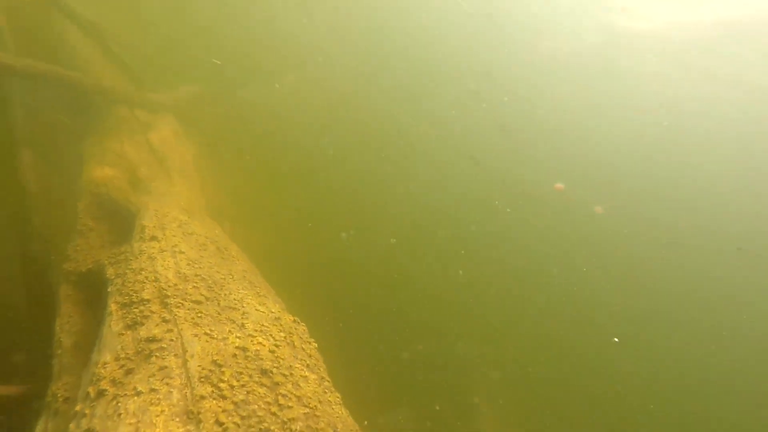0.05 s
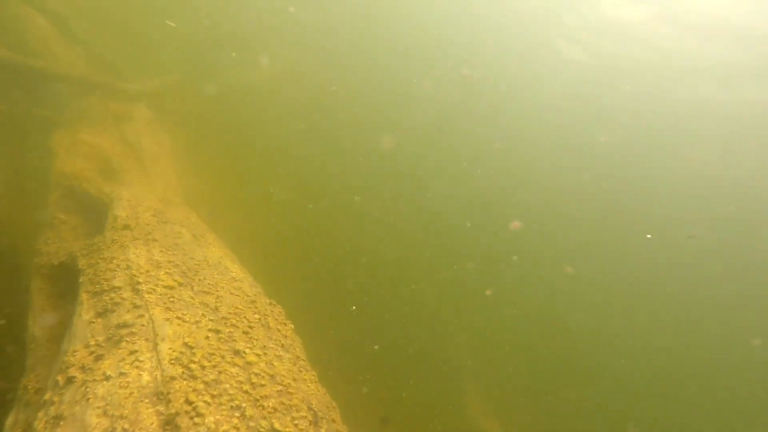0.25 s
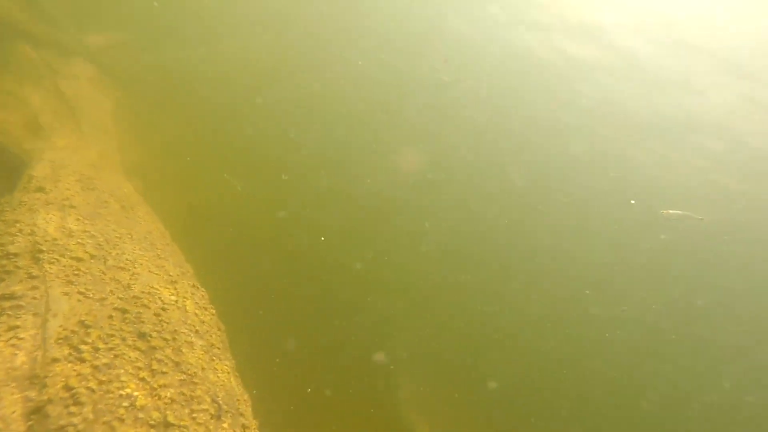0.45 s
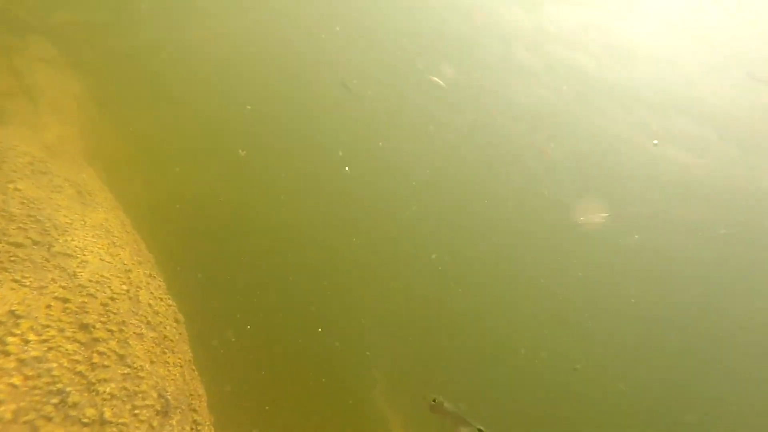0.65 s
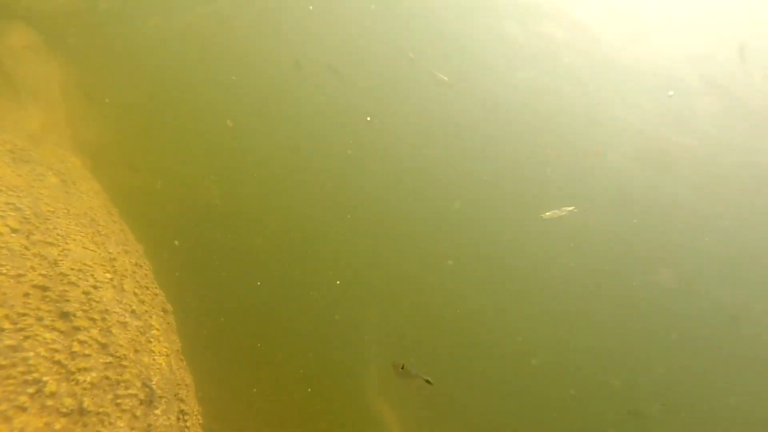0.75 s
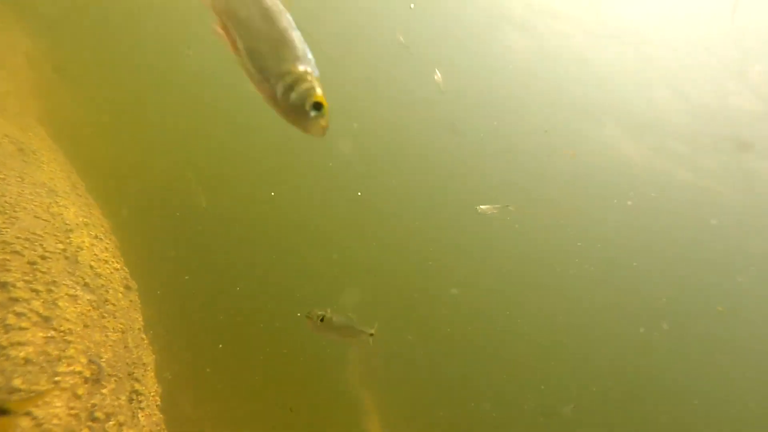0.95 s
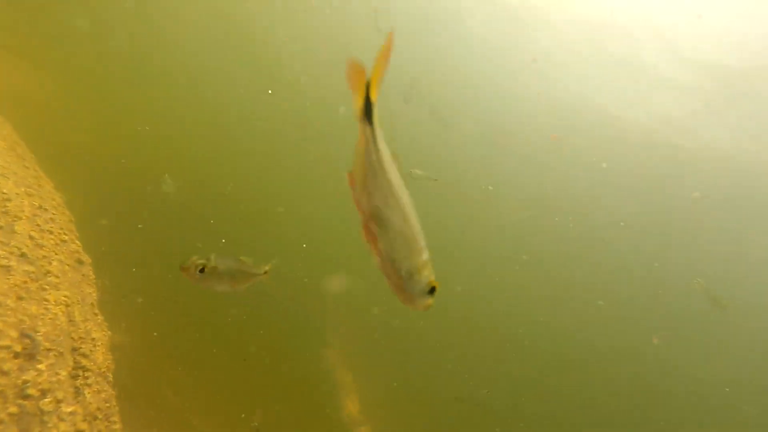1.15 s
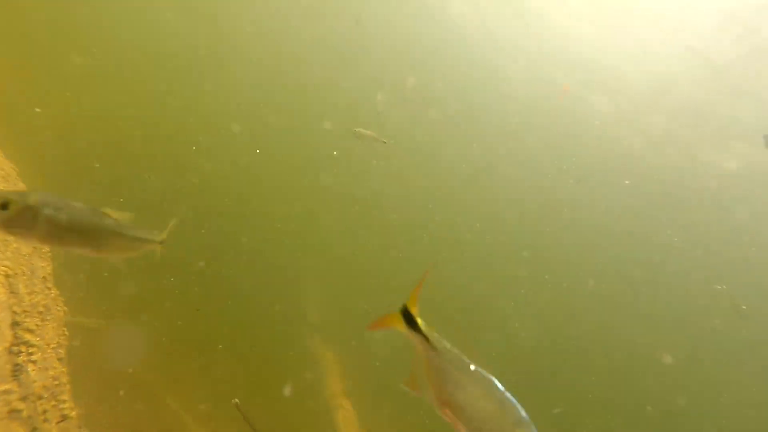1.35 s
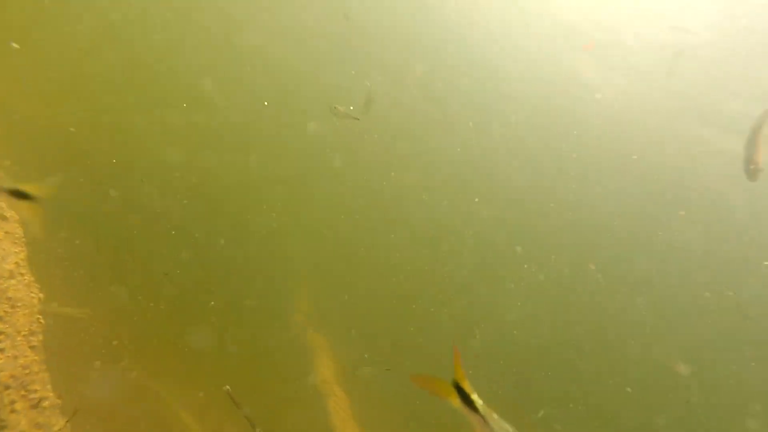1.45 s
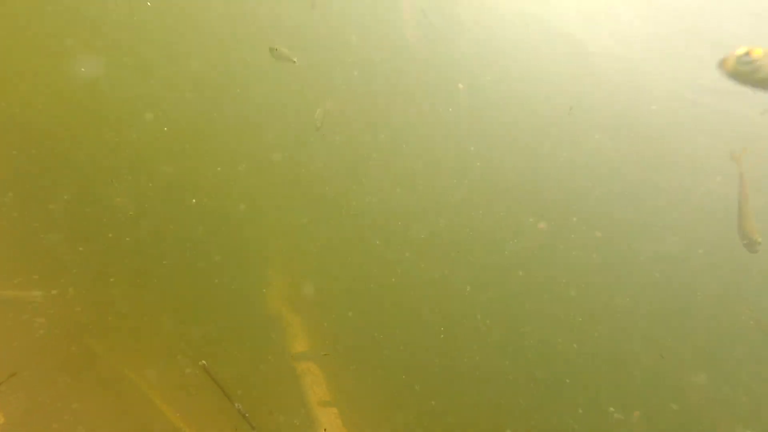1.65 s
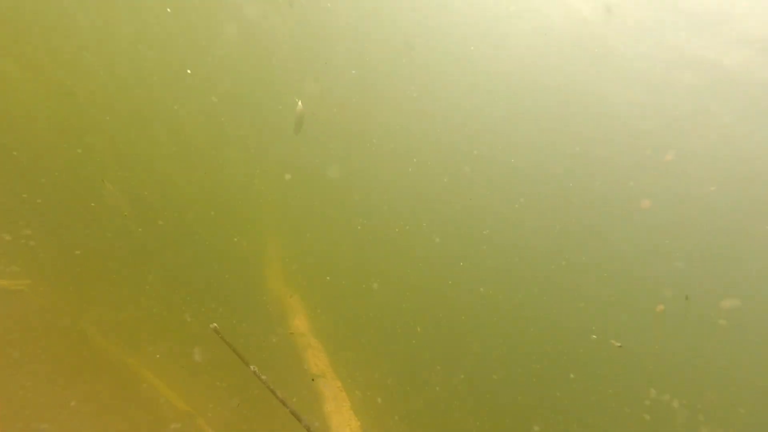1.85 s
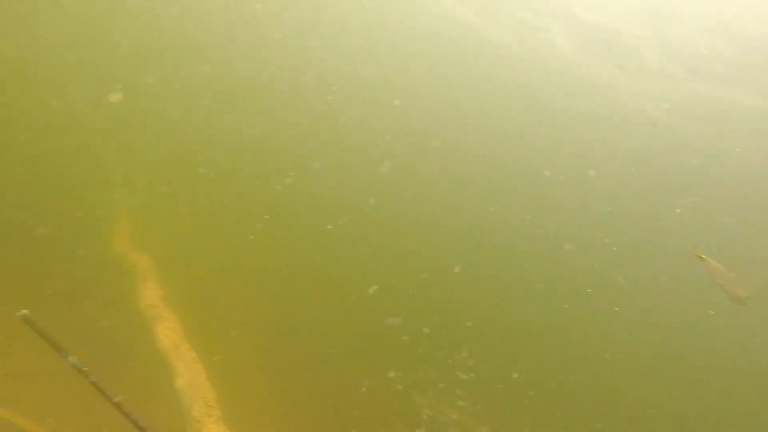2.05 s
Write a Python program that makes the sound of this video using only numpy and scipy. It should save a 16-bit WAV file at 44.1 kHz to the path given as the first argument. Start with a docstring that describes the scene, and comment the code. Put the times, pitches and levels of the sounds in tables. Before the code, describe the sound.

Heard from inside a sealed housing under murky water: loud hollow knocks and gritty rubbing early on, then a long near-quiet of dull rushing water, ended by faint gear bumps, a bubble, a plop and a click.

```python
"""Knocked camera housing under water

Place: under murky water, the microphone behind the housing wall, every contact right against it.
Three hard knocks in quick succession crack as shaped noise, ring damped modes and boom; dense tiny slips scrape
between them. Coloured noise rushes and sways past; later come two soft bumps of the gear, a bubble, a low plop
and a short click, all damped modes. The camera's gain control ducks at the knocks and slowly lets the rush back in."""
import sys
import numpy as np
from scipy import signal
from scipy.fft import rfft, irfft, next_fast_len
from scipy.io import wavfile
from scipy.ndimage import uniform_filter1d, minimum_filter1d

SR = 44100
rng = np.random.default_rng(int(sys.argv[2]) if len(sys.argv) > 2 else 0)


def store_pcm(level_fs):
    """Save levels as 16-bit WAV."""
    pcm = np.round(np.clip(level_fs, -1, 1) * 32767).astype(np.int16)
    wavfile.write(sys.argv[1], SR, np.atleast_2d(pcm).T)


N = 92610  # samples, 2.1 s


def amp(db):
    """Decibels to amplitude gain."""
    return 10 ** (np.asarray(db) / 20)


def unit(x):
    """Scale to rms 1."""
    return x / np.sqrt(np.mean(x ** 2) + 1e-20)


def since(start_s):
    """Seconds after start_s, zero before it."""
    return np.maximum(np.arange(N) / SR - start_s, 0)


def filtered(x, response):
    """Multiply the spectrum of x by a response of frequency, padded against wrap-around."""
    size = next_fast_len(N + 8192)
    spectrum = rfft(x, size) * response(np.fft.rfftfreq(size, 1 / SR))
    return irfft(spectrum, size)[:N]


def curve_gain(hz, points):
    """Gain at hz along (f/Hz, level/dB) points joined over log frequency."""
    f, db = np.transpose(points)
    return amp(np.interp(np.log(hz + 1), np.log(f), db))


def coloured(x, points):
    """Shape x by the curve through the points, at rms 1."""
    return unit(filtered(x, lambda hz: curve_gain(hz, points)))


def struck(force, points):
    """Pass force through a minimum-phase body of unit energy, which never sounds before the blow."""
    size = 2048
    cepstrum = irfft(np.log(curve_gain(np.fft.rfftfreq(size, 1 / SR), points)))
    # folding the cepstrum onto positive times makes the response causal
    cepstrum[1:size // 2] *= 2
    cepstrum[size // 2 + 1:] = 0
    response = irfft(np.exp(rfft(cepstrum)))
    return signal.fftconvolve(force, response / np.linalg.norm(response))[:N]


def ring(start_s, hz, t60, rise):
    """One damped mode: a sine that rises softly and falls 60 dB in t60 seconds."""
    t = since(start_s)
    return np.sin(2 * np.pi * hz * t) * amp(-60 * t / t60) * (1 - np.exp(-t / rise))


RUSH_DB, PATCHY_DB = -55.5, 0.5  # rush rms level; rms wander of its patches
# Spectrum of water rushing past: f/Hz, relative level/dB
RUSH_COLOUR = [(60, -16), (110, -2), (240, -5.5), (400, -7.5), (800, -12.5), (1600, -16), (3300, -21),
               (6500, -29), (11000, -37), (14400, -47.5), (16000, -61)]
# Spectrum of the slow water pressure on the housing: f/Hz, relative level/dB
SWAY_COLOUR = [(15, -3.5), (30, -1.5), (60, -11), (130, -17), (250, -30), (600, -58.5), (2000, -120)]
# Rise and fall of that pressure: t/s, level/dB
SWAY_LEVEL = [(0, -55), (.3, -37.5), (0.701, -53.5), (1.439, -52.5), (1.486, -39), (1.58, -53), (1.72, -57),
              (1.8, -48), (1.95, -54.5), (2.022, -40), (2.1, -45.5)]


def water():
    """A steady, slightly patchy noise rush over the slow pressure of water on the housing."""
    spectrogram = signal.stft(rng.standard_normal(N), nperseg=512)[2]
    # patches about 6 bins tall and 14 frames long
    field = uniform_filter1d(rng.standard_normal(spectrogram.shape), size=6, axis=0)
    field = uniform_filter1d(field, size=14, axis=1)
    patchy = signal.istft(spectrogram * amp(PATCHY_DB * unit(field)))[1][:N]
    rush = amp(RUSH_DB) * coloured(patchy, RUSH_COLOUR)
    sway_db = np.interp(np.arange(N) / SR, *np.transpose(SWAY_LEVEL))
    return rush + amp(sway_db) * coloured(rng.standard_normal(N), SWAY_COLOUR)


# Soft bumps of the gear: t/s, level/dB
BUMPS = [(1.5053, -27), (2.09, -43.5)]
# Modes every bump rings with: f/Hz, level relative to the bump/dB, t60/s
BUMP_MODES = [(129, 4.5, .035), (376, 1, 0.04), (594, -1, 0.092), (710, -10, 0.015)]
# A bubble, a low plop and a short click, in that order: t/s, level/dB, f/Hz, t60/s
SMALL_SOUNDS = [(1.57, -45.5, 1790, 0.029), (1.792, -42, 196, 0.064), (2.0897, -19.5, 2400, 0.0031)]


def bumps_and_small_sounds():
    """Gear bumps ring several modes with a soft onset; bubble, plop and click ring one with a sharp onset."""
    out = np.zeros(N)
    for s, bump_db in BUMPS:
        for hz, mode_db, t60 in BUMP_MODES:
            out += amp(bump_db + mode_db) * ring(s, hz, t60, rise=0.0015)
    for s, db, hz, t60 in SMALL_SOUNDS:
        out += amp(db) * ring(s, hz, t60, rise=0.00032)
    return out


SLIPS_PER_S = 3400
# Gear rubbing on the mount: t of the peak/s, rise over 20 dB/s, fall over 20 dB/s, peak level/dB
SCRAPES = [(0.2458, .003, .003, -19.5), (.2585, 0.0022, 0.0052, -35), (.365, 0.055, 0.035, -39.5),
           (0.388, 0.011, 0.01, -24), (0.393, 0.024, 0.0043, -28.5)]
# Spectrum of the rubbing: f/Hz, relative level/dB
SCRAPE_COLOUR = [(60, 0), (170, 18), (330, -3), (700, -6.5), (1100, 3.5), (1800, -9.5), (2080, -7.5),
                 (2260, 3.5), (2520, -8.5), (3100, -14.5), (4700, -33.5), (5900, -30.5), (7200, -23.5),
                 (9000, -39), (15000, -53)]


def scrapes():
    """Dense tiny slips at random instants, swelling and fading between the knocks as the force changes."""
    t = np.arange(N) / SR
    slips = rng.standard_normal(N) * (rng.random(N) < SLIPS_PER_S / SR)
    force = np.zeros(N)
    for peak_s, rise, fall, db in SCRAPES:
        force += amp(db - 20 * np.maximum((peak_s - t) / rise, (t - peak_s) / fall))
    return force * coloured(slips, SCRAPE_COLOUR)


AFTERSWAY_HZ, AFTERSWAY_T60 = 71, 0.21  # Hz, s
# Push of each knock on the whole housing: t/s, level/dB, f/Hz, t60/s, rise/s, aftersway level/dB
THUDS = [(0.2137, 6, 196, 0.079, .0005, -30), (.2406, 8.5, 134.3, 0.085, 0.00057, -12.5),
         (0.4092, 9, 143.5, 0.035, 0.0022, -28)]


def thuds():
    """The whole housing booms briefly as one low mode and sways on in a lower one after each blow."""
    out = np.zeros(N)
    for s, db, hz, t60, rise, sway_db in THUDS:
        out += amp(db) * ring(s, hz, t60, rise)
        out += amp(sway_db) * ring(s, AFTERSWAY_HZ, AFTERSWAY_T60, rise)
    return out


CRACK_T60, GRIT_DB, SNAP_DB = 0.016, 5.5, 11.5  # tail s; levels before the crack level and filters
# Spectrum of a hard contact: f/Hz, relative level/dB
CRACK_COLOUR = [(60, -10.5), (400, 1.5), (1000, 8), (1800, -16.5), (2400, 0.5), (3500, -13), (4800, -27),
                (5900, -19), (7500, -24.5), (8700, -33), (10000, -35), (11300, -30), (13000, -36.5),
                (16000, -41)]


def crack(start_s, top_hz):
    """One snap and a short gritty noise tail; a low-pass takes the treble off softer contacts."""
    t = since(start_s)
    force = rng.standard_normal(N) * amp(GRIT_DB - 60 * t / CRACK_T60) * (t > 0)
    force[round(start_s * SR)] += amp(SNAP_DB)
    soft = signal.butter(3, top_hz, fs=SR, output="sos")
    return signal.sosfilt(soft, struck(force, CRACK_COLOUR))


HOLLOW_HZ = 1000
# Housing modes: f/Hz, level relative to the ring/dB, t60/s
HOUSING_MODES = [(295, -10, 0.013), (428, -9, 0.012), (727, -10.5, 0.022), (916, -2, 0.041),
                 (1092, 2.5, 0.011), (1422, -9, .02), (1588, -9.5, 0.016), (2204, -1, 0.02),
                 (2445, -18.5, .02), (2800, -15, 0.022), (3077, -17, .018), (3780, -27, 0.011),
                 (5720, -28, 0.013), (6880, -23.5, 0.0098)]
# Mount modes: f/Hz, level relative to the mount ring/dB, t60/s
MOUNT_MODES = [(186.2, 1, 0.12), (485.5, -15, 0.093), (1040, -28, 0.1)]
# Hard contacts, some knocks being two close together: t/s, housing ring level/dB,
# extra level of the hollow low modes/dB, crack level/dB, top f of the crack/Hz, mount ring level/dB
KNOCKS = [(0.211, -0.5, 13, -4, 13020, -23.5), (0.2156, -6.5, 9, -15, 7380, -28),
          (.2380, -8.5, -9.5, -15.5, 9700, -19), (0.4106, 0.5, -11, -16, 10180, -1.5),
          (.4153, -12.5, -6.5, -21, 7100, -41)]


def knocks():
    """Each hard contact cracks and sets the damped modes of the housing and its mount ringing."""
    out = np.zeros(N)
    for s, ring_db, hollow_db, crack_db, top_hz, mount_db in KNOCKS:
        for k, (hz, db, t60) in enumerate(HOUSING_MODES):
            # each contact excites the modes a little differently, with alternating sign
            level = ring_db + db + hollow_db * (hz < HOLLOW_HZ) + rng.normal(0, 1)
            out += (-1) ** k * amp(level) * ring(s, hz, t60, rise=0.0015)
        for hz, db, t60 in MOUNT_MODES:
            out += amp(mount_db + db) * ring(s, hz, t60, rise=0.003)
        out += amp(crack_db) * crack(s, top_hz)
    return out


def scene():
    """Sum of all the sounds that reach the microphone through the housing."""
    return (knocks() + thuds() + scrapes() + bumps_and_small_sounds() + water())[None]


DUCK_ABOVE_DB, DUCK_DB = -9.5, 9  # threshold; greatest reduction
DUCK_ATTACK_S, HOLD_S, RECOVER_DB_PER_S = 0.0046, 0.13, 23
TOP_HZ = 15600


def gain_control(x):
    """Duck peaks over the threshold, starting just ahead of them, then hold and recover steadily."""
    t = np.arange(N) / SR
    over_db = np.clip(20 * np.log10(np.abs(x) + 1e-9) - DUCK_ABOVE_DB, 0, DUCK_DB)
    hold = int(HOLD_S * SR) | 1  # odd window, reaching back
    held_db = -minimum_filter1d(-over_db, hold, origin=hold // 2, mode="constant")
    recovered_db = RECOVER_DB_PER_S * t
    duck_db = np.maximum.accumulate(held_db + recovered_db) - recovered_db
    attack = int(DUCK_ATTACK_S * SR) | 1  # odd window, reaching ahead
    return x * amp(-uniform_filter1d(duck_db, attack, origin=-(attack // 2)))


def record(dry):
    """The camera: gain control, smooth clipping of the peaks towards full scale, then a band limit."""
    x = gain_control(dry[0])
    clipped = x / (1 + np.abs(x) ** 8) ** (1 / 8)
    return filtered(clipped, lambda hz: hz < TOP_HZ)[None]


dry = scene()
out = record(dry)
store_pcm(out)
```